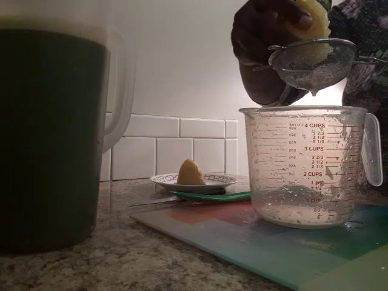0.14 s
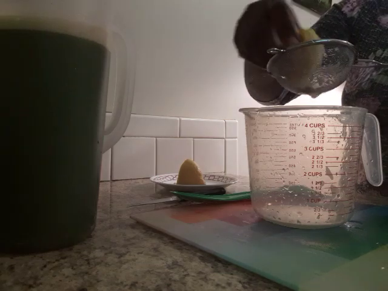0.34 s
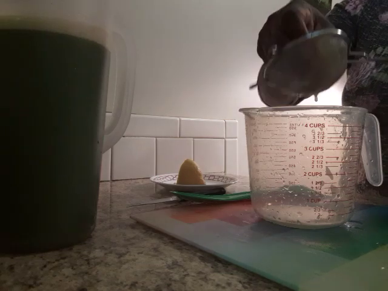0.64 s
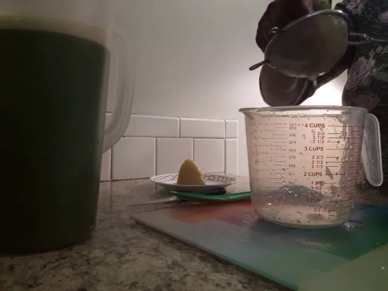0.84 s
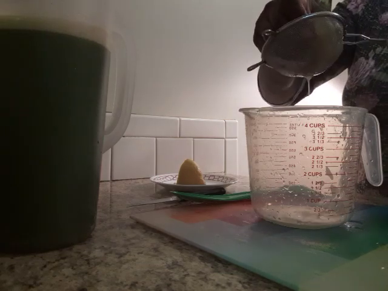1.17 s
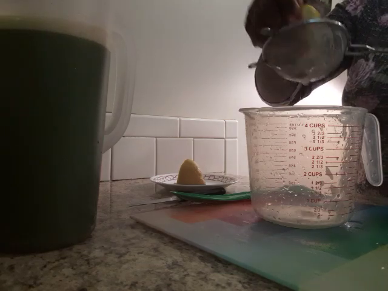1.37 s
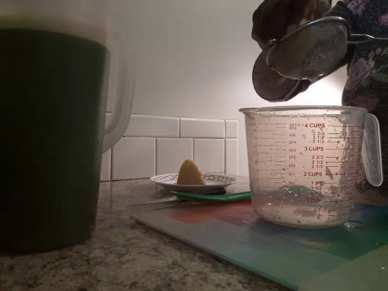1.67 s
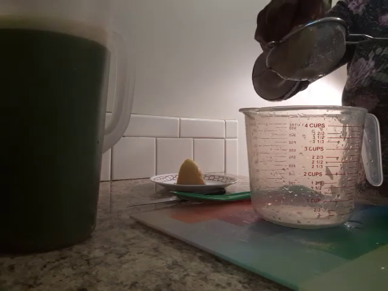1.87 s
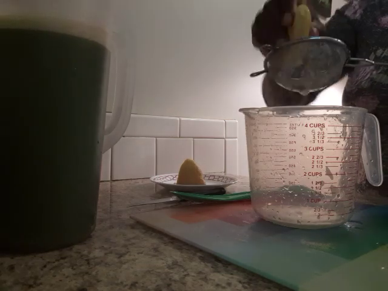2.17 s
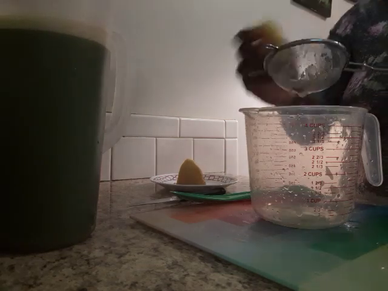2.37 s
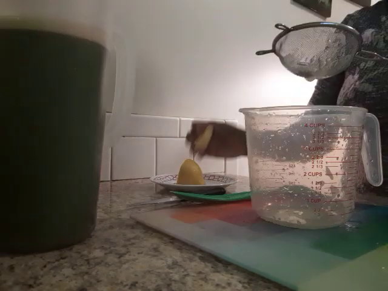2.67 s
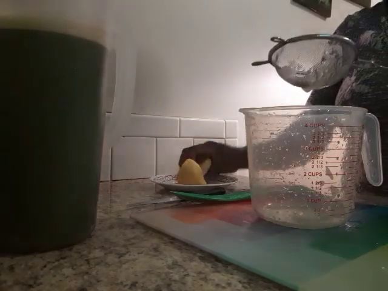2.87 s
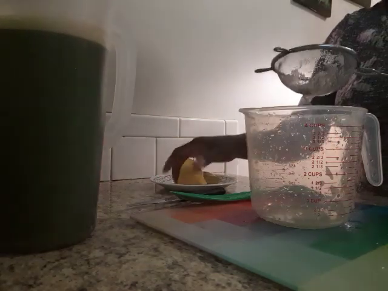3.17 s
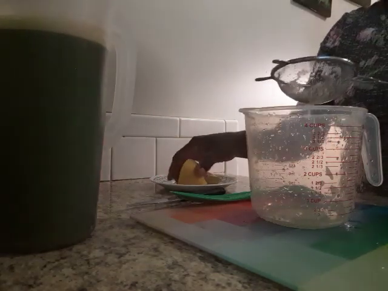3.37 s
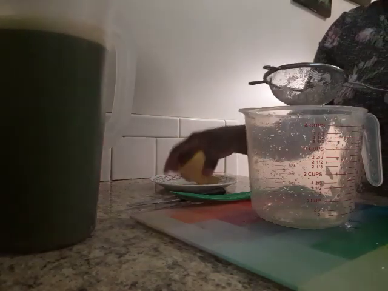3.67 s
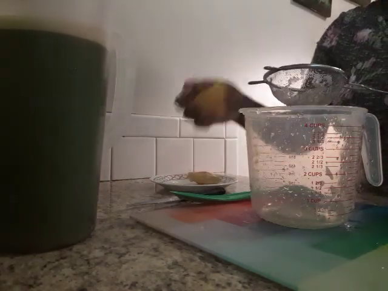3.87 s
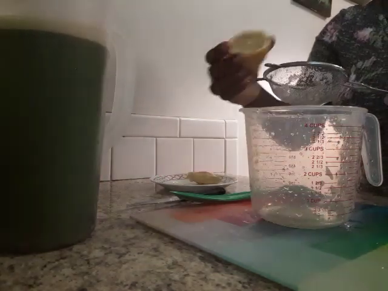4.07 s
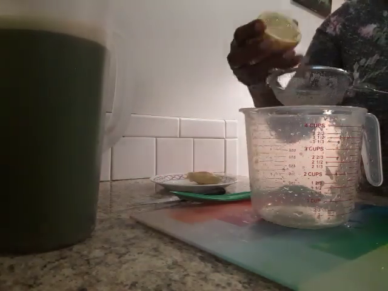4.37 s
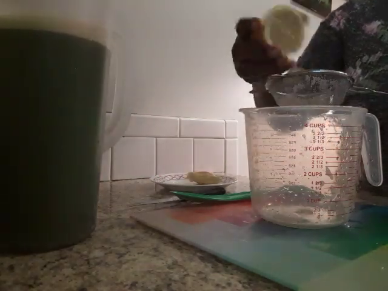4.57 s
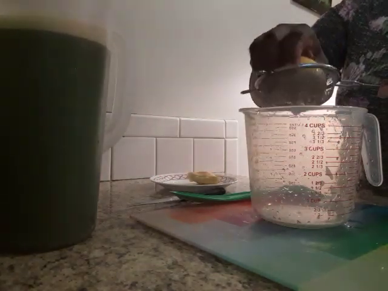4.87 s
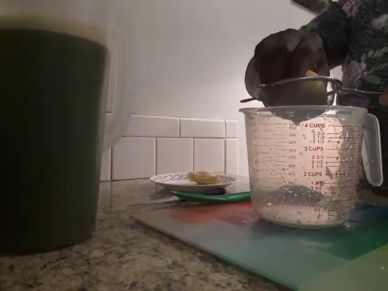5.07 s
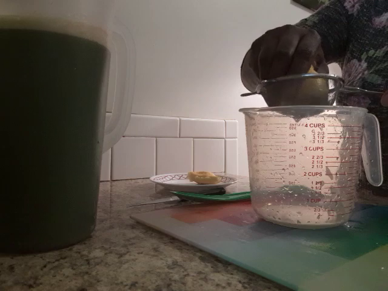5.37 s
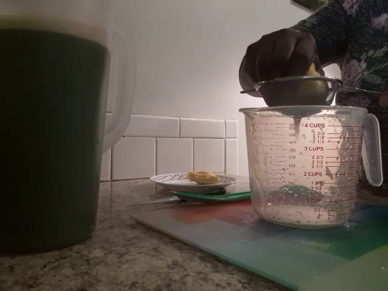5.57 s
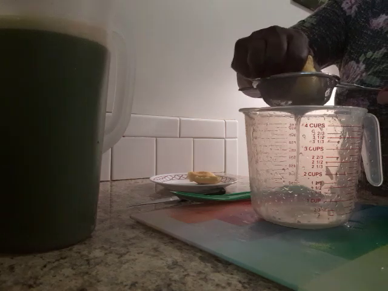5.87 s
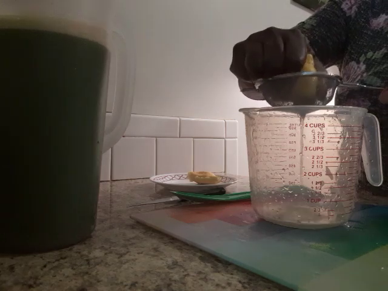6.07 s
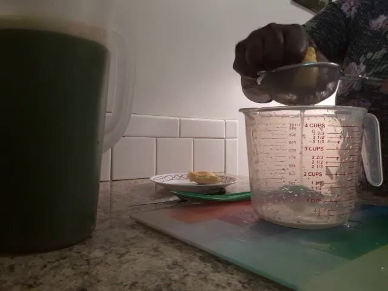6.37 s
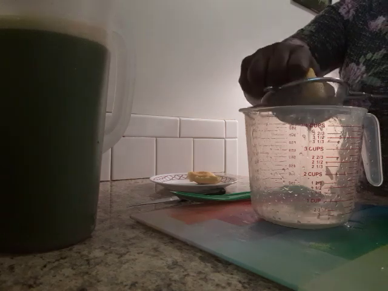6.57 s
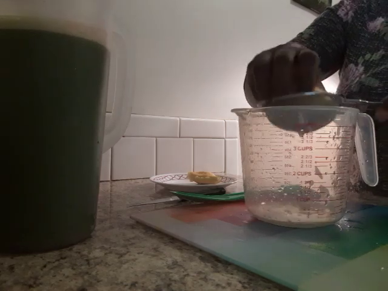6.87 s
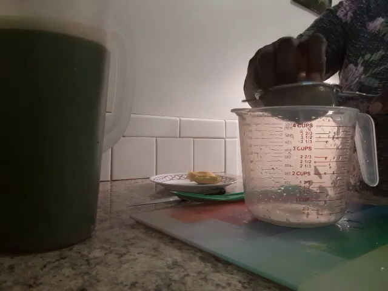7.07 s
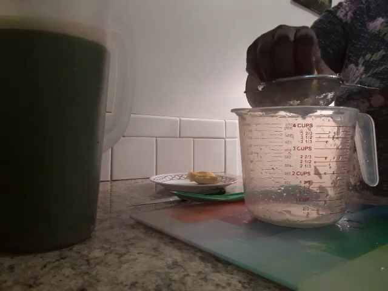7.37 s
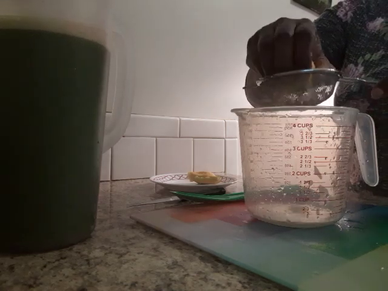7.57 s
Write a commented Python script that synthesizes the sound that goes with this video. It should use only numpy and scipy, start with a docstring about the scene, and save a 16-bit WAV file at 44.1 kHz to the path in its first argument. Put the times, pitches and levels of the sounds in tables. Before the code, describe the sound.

Lemon halves squeezed by hand over a metal strainer, pulp squelching and popping, juice squirting and dripping into a plastic jug, soft counter thumps midway.

```python
"""In a tiled kitchen, lemon halves are squeezed by hand over a steel strainer, close to a stereo microphone.
Pulp squelches and pops as grainy noise, juice squirts as sputtering noise through a slit, and drops ring a plastic jug.
A spent half is set on a saucer and the counter under the microphone booms as damped low modes.
The hands are nearer the left port; tiles echo, narrow tones and hums swell, and the house rumbles faintly."""
import sys
import numpy as np
from scipy import signal
from scipy.fft import rfft, irfft, next_fast_len
from scipy.io import wavfile
from scipy.ndimage import map_coordinates

SR = 44100
rng = np.random.default_rng(int(sys.argv[2]) if len(sys.argv) > 2 else 0)


def generate_wav(signal):
    """Clip the signal to [-1, 1] and save it as 16-bit WAV at the path in sys.argv[1]."""
    frames = np.transpose(np.atleast_2d(signal))
    scaled = np.clip(frames, -1, 1) * 32767
    pcm = np.round(scaled).astype(np.int16)
    wavfile.write(sys.argv[1], SR, pcm)


N = 340893  # samples

# Juice and air forced through pulp, sleeves brushing between: time_s, hiss_db, body_db (wet body against hiss)
SQUEEZE_FLOW = [(0.0, -65, -26), (0.32, -69, -31), (0.46, -74.5, -11), (0.62, -63.5, -14.5),
                (0.76, -79, -15), (0.95, -69.5, -1), (1.2, -77, -17), (1.4, -70, -26), (1.48, -85, -29),
                (1.8, -82.5, -35), (2.02, -74, -5), (2.3, -88, -19), (2.6, -70.5, -8.5),
                (2.77, -78.5, -2.5), (2.95, -67.5, -3), (3.13, -78.5, 8), (3.29, -69.5, -4),
                (3.42, -83.5, -0.5), (4.2, -111, 22.5), (4.69, -68, -11.5), (5.0, -79, 0),
                (5.23, -63.5, -5.5), (5.6, -66, -7), (5.98, -59, -10), (6.3, -67, -1.5), (6.88, -65, -4),
                (7.0, -74, 1.5), (7.36, -80, 8), (7.45, -76, 5.5), (7.6, -64.5, 0.5), (7.73, -80, 6.5)]
# Relative spectra of the hiss, the fine spray and the wet body: pitch_hz, level_db
HISS_SPECTRUM = [(1060, -45), (1800, -34.5), (2090, -9.5), (3410, -2), (3850, -2.5), (4500, -4),
                 (6010, -0.5), (7710, -6), (9000, -9), (11700, -49), (19800, -120)]
SPRAY_SPECTRUM = [(5000, -20.5), (8000, -10), (11000, 7), (16500, 2)]
BODY_SPECTRUM = [(350, 3.5), (700, 2.5), (1200, 1.5), (2000, -2), (3000, -25.5)]
# Squirts from the rind: start_s, level_db (before the swell and decay), centre_hz, width_hz, t60_s
RIND_SQUIRTS = [(.6, -52.5, 6060, 3000, 0.18), (0.901, -68, 7000, 6000, .04), (1.358, -69, 3440, 1200, .1),
                (1.902, -59, 2620, 940, 0.6), (1.91, -59, 3640, 2500, 0.37),
                (2.177, -68, 8500, 6000, 0.098), (4.276, -73.5, 3560, 1210, 1),
                (4.998, -68, 11100, 1500, .2), (5.294, -45.5, 9300, 7000, 0.033),
                (5.34, -54, 4400, 4160, 0.1), (5.466, -44.5, 3500, 2030, 0.28),
                (5.47, -59.5, 1430, 1210, 0.44), (5.475, -41.5, 10500, 7160, 0.2),
                (5.507, -43.5, 5640, 2500, 0.28), (5.841, -57, 9300, 6000, 0.3),
                (6.101, -45, 10100, 5000, 0.095), (6.375, -48, 9000, 9100, 0.02),
                (6.628, -52.5, 3900, 1200, 0.043), (6.661, -49, 8400, 5040, 0.054),
                (6.652, -52.5, 3030, 500, 0.036), (6.678, -47.5, 3210, 700, 0.042),
                (6.685, -54, 1680, 400, 0.038), (6.682, -55, 12600, 4000, 0.055),
                (6.861, -53, 6400, 1985, 0.041), (7.049, -68.5, 3350, 905, 0.08),
                (7.048, -65.5, 6030, 2000, 0.11)]
# Pops of pulp and ticks of the mesh: start_s, level_db, centre_hz, edge_db (bright edge against body)
PULP_POPS = [(0.0472, -44, 7060, -6), (0.598, -33, 5300, -40), (0.6719, -25.5, 6660, 16),
             (0.8932, -39, 8200, 15), (0.9208, -35.5, 6240, -14), (0.9513, -26, 3240, 21),
             (0.9895, -27, 3000, 15.5), (1.12, -44, 4600, -24), (1.1543, -42, 2800, -19),
             (1.293, -43.5, 7240, -19.5), (1.336, -32.5, 7900, -7), (1.648, -50.5, 6630, -11),
             (1.837, -47, 8200, -15), (1.8786, -42, 4860, 7), (1.9083, -54, 2700, -21),
             (3.0078, -44, 6050, -10), (3.056, -45, 4960, -25), (3.1597, -52, 6100, -23),
             (3.1784, -47, 4970, -26), (3.2645, -43.5, 4810, -25), (4.3352, -49, 4080, -31),
             (4.669, -50, 7140, -24), (4.8885, -54, 6460, 6), (5.0593, -52, 2870, 16),
             (5.155, -48, 6440, -80), (5.2046, -40.5, 5200, -18), (5.252, -43, 6340, -8),
             (5.301, -38, 8500, 5), (5.3228, -31.5, 8650, 19.5), (5.472, -25.5, 3400, -32),
             (5.7586, -42, 5900, 27), (5.8178, -31.5, 2580, -31), (5.9955, -31, 3400, 1),
             (6.077, -33, 8500, -10), (6.106, -25.5, 8200, -30), (6.1463, -25.5, 2650, 8),
             (6.2437, -29.5, 6340, 5), (6.331, -27, 6400, -31), (6.355, -28.5, 2800, -23),
             (6.3856, -23.5, 2450, 11.5), (6.4328, -25, 6340, -19), (6.572, -40, 6440, -18),
             (6.6139, -38, 6900, -30), (6.6292, -31.5, 3940, -15), (6.6588, -33, 3220, 13),
             (6.7775, -27.5, 1600, -28), (6.838, -30.5, 1510, -28), (6.871, -36, 5870, -7),
             (6.909, -44.5, 7600, -21), (7.219, -48.5, 4900, -35), (7.2382, -45.5, 5080, -21),
             (7.3014, -46.5, 9000, 0), (7.5086, -51, 7850, -25), (7.5383, -48, 5700, -27.5),
             (7.5778, -44, 5200, -30)]
# Resonances of the strainer's wires: pitch_hz, level_db, t60_s
STRAINER_MODES = [(2063, -36, .02), (4500, 3.5, 0.018), (4965, 8.5, 0.026), (5290, -16, 0.03),
                  (5740, 8.5, 0.024), (6120, 6, 0.025), (6700, 7, 0.067), (8200, -23, 0.03)]
# Strainer struck: start_s, level_db
STRAINER_TAPS = [(6.329, -34.5), (6.4314, -13.5)]
# Drops landing in the jug: start_s, level_db, upper_db (upper modes against lower)
JUG_DRIPS = [(0.426, -56.5, 4.5), (0.672, -61.5, -3), (0.888, -64, 0), (0.992, -44, -25), (1.081, -55, 0),
             (1.129, -48.5, 0.5), (1.157, -55, 5.5), (1.227, -56.5, 7), (1.291, -50.5, 5.5),
             (1.334, -55, 3), (1.403, -66, -6), (1.482, -62, 0), (1.543, -65, -1), (1.704, -62, 9.5),
             (2.009, -55.5, 1), (2.342, -61, -2.5), (3.576, -60, -1), (4.614, -59, -5), (5.354, -60, -19),
             (5.471, -57, -21), (5.487, -47, -21), (5.756, -42.5, -2), (5.815, -45.5, -6), (5.904, -59, 0),
             (5.976, -40.5, 1.5), (5.995, -38.5, 4), (6.024, -56, 4), (6.049, -49, -5),
             (6.075, -38.5, -2.5), (6.146, -33.5, -0.5), (6.176, -44, 5), (6.199, -50, 6),
             (6.244, -51, 5.5), (6.299, -56, 0), (6.329, -41.5, 4), (6.356, -35.5, -2.5), (6.388, -37, 2),
             (6.431, -39.5, 0.5), (6.494, -44, -10), (6.512, -41.5, 1.5), (6.572, -44, 2.5),
             (6.614, -46.5, 2), (6.7, -49.5, -15), (6.878, -42, -22.5), (6.981, -53, -22),
             (7.114, -54.5, -5), (7.165, -55, -4), (7.2, -53, -10), (7.618, -50.5, -5), (7.648, -54.5, -4)]
# Resonances of the jug's walls: pitch_hz, level_db, t60_s
JUG_MODES = [(529.7, -15.5, 0.12), (607.8, -4.5, 0.14), (658.3, -4.5, 0.075), (758, -13.5, 0.1),
             (820, -7.5, 0.11), (901, -8.5, 0.078), (1284, -17, 0.051), (1681, -11, 0.046),
             (2090, -16, 0.0083), (3120, -29, 0.11)]
# Thin patter of juice: start_s, length_s, level_db
JUICE_STREAM = [(1.12, 0.39, -73), (5.79, 0.9, -63.5)]
# Sleeve rubbing and strainer bumping on the jug:
# start_s, level_db (before the swell and decay), centre_hz, width_hz, t60_s
JUG_CONTACTS = [(.35, -76.5, 480, 250, 0.68), (.47, -67.5, 580, 500, .1), (.48, -79, 1340, 500, .2),
                (2.8, -68, 680, 348, 0.35), (6.778, -55.5, 346, 600, 0.3), (6.83, -55.5, 500, 400, 0.13),
                (6.865, -54, 294, 250, 0.27), (6.96, -69.5, 300, 500, 0.45)]
# Resonances of the saucer: pitch_hz, level_db, t60_s
SAUCER_MODES = [(3990, 7, 0.2), (5280, 2, .15), (6750, -4, .06)]
# Saucer touched: start_s, level_db
SAUCER_CLINKS = [(2.833, -73), (2.975, -64)]
# Saucer, hand and nudged jug bumping the counter: start_s, level_db
COUNTER_BUMPS = [(2.829, -31.5), (2.867, -29), (2.972, -32), (3.006, -25), (3.056, -17), (3.177, -19.5),
                 (3.195, -16.5), (3.235, -25), (3.299, -37.5), (3.363, -28.5), (3.389, -36.5),
                 (3.439, -45.5), (3.49, -47), (6.781, -51), (6.822, -49), (6.875, -43), (6.901, -44.5)]
# Resonances of the counter slab: pitch_hz, level_db, t60_s
COUNTER_MODES = [(89.1, -13.5, 0.36), (131.6, -0.5, 0.24), (149.7, -8, .12), (220.2, -16, 0.19),
                 (268.2, -10, 0.11), (310, -14, 0.14), (394, -24, 0.17), (503, -30, 0.099)]
# Faint narrow tones, then low hums, that swell and fade: start_s, end_s, start_hz, end_hz, width_hz, level_db
FAINT_TONES = [(.5, .86, 1220, 1185, 111, -74.5), (1.88, 2.32, 1260, 1103, 50.4, -81.5),
               (2.62, 2.97, 490, 523, 93, -71.5), (3.7, 3.949, 500, 511, 142, -71.5)]
LOW_HUMS = [(1.8, 2.7, 66.1, 76, 6.9, -67.5), (4.2, 5.0, 110.4, 110.7, 7.1, -62)]
# Deep rumble of the house: time_s, level_db
HOUSE_RUMBLE = [(0, -69), (2, -70.5), (3.6, -66), (4.4, -69.5), (5.8, -64.5), (6.9, -63), (7.73, -65.5)]
# Relative spectra of the rumble, the drone, and the room air with microphone hiss: pitch_hz, level_db
RUMBLE_SPECTRUM = [(25, -36), (45, -10.5), (75, -11.5), (110, -13.5), (200, -45.5)]
DRONE_SPECTRUM = [(60, -17), (85, -0.5), (120, -1.5), (170, -5), (220, -5), (260, -12.5), (340, -18),
                  (450, -37), (800, -61)]
AIR_SPECTRUM = [(180, -33), (300, 3), (361, -8), (496, -5), (863, -10.5), (970, -13), (5100, -13.5),
                (6670, -6.5), (8730, -19.5), (14900, -13), (16500, -32)]
# Likeness of the house's left and right: pitch_hz, likeness (0 to 1)
LEFT_RIGHT_LIKENESS = [(60, .97), (250, 0.89), (600, 0.26), (2000, 0), (16000, 0)]
# Decay of the kitchen's echo: pitch_hz, t60_s
KITCHEN_DECAY = [(300, 0.22), (2000, 0.36), (6000, 0.24), (14000, 0.26)]

# Spray at the usual hiss, that usual hiss, spray dB per dB of hiss, spray dB per dB less of wet body
SPRAY_DB, USUAL_HISS_DB, SPRAY_GROWS, DRY_SPRAYS = -81, -71, 0.48, 0.31
SQUIRT_RISE_S, SQUIRT_HOLD_S, SQUIRT_FLUTTER_DB = 0.0047, 0.018, 4.5
CONTACT_RISE_S, CONTACT_HOLD_S, CONTACT_FLUTTER_DB = 0.01, 0.037, 1.5
# Decay of a pop at the middle pitch, and the power by which higher ones die sooner
POP_T60_S, POP_MIDDLE_HZ, POP_SHORTENS = 0.021, 5000, 0.23
FAINT_POP_COUNT, FAINT_POP_DB = 40, 16  # least level, against the hiss around them
STREAM_EDGE_DB_PER_S = 250  # how fast the patter swells and thins out
KNOCK_DB = -9.5  # dull knock against the boom
DRONE_DB, DRONE_GROWS = -66, 1  # mean drone, its dB per dB of deep rumble
AIR_DB = -73.5
HANDS_LEFT_DB, HANDS_LEAD_S = 11, 0.000397  # left over right in the bass; left ahead of right
TOP_STEP_HZ, TOP_END_HZ = 15750, 16800


def squeeze():
    """Noise broken by tiny bursting cells; the flow comes in uneven surges, and more flow sprays more."""
    out, surge = np.zeros(N), wobble(13)
    hiss_db, body_db = curves(SQUEEZE_FLOW)
    spray_db = SPRAY_DB + SPRAY_GROWS * (hiss_db - USUAL_HISS_DB) - DRY_SPRAYS * body_db
    layers = [(hiss_db, HISS_SPECTRUM), (spray_db, SPRAY_SPECTRUM), (hiss_db + body_db, BODY_SPECTRUM)]
    for level_db, spectrum in layers:
        cells = (rng.random(N) < 500 / SR) * rng.exponential(size=N) * rng.standard_normal(N)
        grain = rng.standard_normal(N) + 0.5 * unit(cells)
        # the surge is common to all layers, the quicker flutter is each layer's own
        uneven_db = 2.2 * np.tanh(surge) + 3 * np.tanh(wobble(45))
        out += amp(level_db + uneven_db) * coloured(grain, spectrum)
    return out


def squirts():
    """Juice jets through slits in the rind as sputtering noise."""
    return bursts(RIND_SQUIRTS, SQUIRT_RISE_S, SQUIRT_HOLD_S, SQUIRT_FLUTTER_DB)


def pops():
    """Each pop is a burst of noise through a broad resonance, with a shorter bright edge."""
    out, t = np.zeros(N), np.arange(SR // 8) / SR
    bright = lambda f: (1j * f / (9000 + 1j * f)) ** 2
    for s, db, centre_hz, edge_db in [*PULP_POPS, *faint_pops()]:
        t60 = POP_T60_S * (POP_MIDDLE_HZ / centre_hz) ** POP_SHORTENS
        decay = amp(-60 * t / np.array([[t60], [0.18 * t60]]))
        onset = 1 - np.exp(-t / 0.00071)
        body, edge = rng.standard_normal((2, len(t))) * decay * onset
        peak = resonance(centre_hz, 0.6 * centre_hz)
        cell = lambda f: peak(f) + 0.08 * 1j * f / (500 + 1j * f)  # with a broad skirt
        add(out, s, amp(db) * (filtered(body, cell) + amp(edge_db) * filtered(edge, bright)))
    return out


def faint_pops():
    """Rows like those of PULP_POPS at chance moments, their strength following the squeezing hiss."""
    when, size, pitch, edge = rng.random((FAINT_POP_COUNT, 4)).T
    hiss_db = curves(SQUEEZE_FLOW)[0][(when * N).astype(int)]
    level_db = hiss_db + FAINT_POP_DB + 5 * size
    return zip(when * N / SR, level_db, 3000 + 5000 * pitch, -10 - 20 * edge)


def strainer():
    """Taps make the wires chatter for a moment: a noise burst through the mesh's resonances."""
    out, t = np.zeros(N), np.arange(SR // 8) / SR
    wires = lambda f: sum(amp(level) * resonance(hz, 2.2 / t60 + 120)(f) for hz, level, t60 in STRAINER_MODES)
    for s, db in STRAINER_TAPS:
        rattle = rng.standard_normal(len(t)) * amp(-60 * t / 0.021)
        add(out, s, amp(db) * filtered(rattle, wires))
    return out


def drips():
    """Drops ring the jug's walls and splash; a big flat drop favours the lower modes."""
    out, t = np.zeros(N), np.arange(SR // 5) / SR
    upper = np.array([hz > 700 for hz, _, _ in JUG_MODES])
    soft = 1 - np.exp(-t / 0.0018)  # a wet landing starts softly
    for s, db, upper_db in JUG_DRIPS:
        burst = rng.standard_normal(len(t)) * amp(-60 * t / 0.05)
        splash = filtered(burst, resonance(3300, 2000))
        walls = ring(JUG_MODES, upper * upper_db, 0.2, detune=0.024, spread_db=2.5)
        add(out, s, amp(db) * soft * (walls + amp(0.5) * splash))
    return out


def stream():
    """A patter of soft droplets excites the jug's walls, swelling and thinning at its ends."""
    walls = lambda f: sum(amp(db) * resonance(hz, 7 / t60)(f) for hz, db, t60 in JUG_MODES)
    rounded = lambda f: walls(f) * (1200 / (1200 + 1j * f)) ** 2  # droplets land softly
    droplets = (rng.random(N) < 160 / SR) * rng.standard_normal(N)
    spatter = unit(filtered(droplets + 0.0043 * rng.standard_normal(N), rounded))
    now, gain = np.arange(N) / SR, np.zeros(N)
    for start, length, db in JUICE_STREAM:
        outside_s = np.clip(np.maximum(start - now, now - start - length), 0, None)
        gain += amp(db - STREAM_EDGE_DB_PER_S * outside_s)
    return spatter * gain


def jug_contacts():
    """Sleeve rubbing and strainer bumping on the jug: grainy noise coloured by its wall."""
    return bursts(JUG_CONTACTS, CONTACT_RISE_S, CONTACT_HOLD_S, CONTACT_FLUTTER_DB)


def saucer():
    """Each touch rings the saucer's damped high modes."""
    out = np.zeros(N)
    for s, db in SAUCER_CLINKS:
        add(out, s, amp(db) * ring(SAUCER_MODES, 0, 0.4, detune=0.00096))
    return out


def counter():
    """Soft bumps drive the slab's low modes; a dull knock rides on each."""
    out, t = np.zeros(N), np.arange(SR // 2) / SR
    dull = lambda f: (500 / (500 + 1j * f)) ** 2
    for s, db in COUNTER_BUMPS:
        boom = ring(COUNTER_MODES, 0, 0.5, detune=0.01, spread_db=-2.0) * (1 - np.exp(-t / 0.0053))
        knock = filtered(rng.standard_normal(len(t)) * amp(-60 * t / 0.15), dull)
        add(out, s, amp(db) * (boom + amp(KNOCK_DB) * knock))
    return out


def gliding_tones(table):
    """Narrow noise and a little pure tone on a gliding centre, swelling and fading."""
    out = np.zeros(N)
    for start, end, from_hz, to_hz, width_hz, db in table:
        u = np.linspace(0, 1, round((end - start) * SR))
        narrow = lambda f: np.exp(-(2 * f / width_hz) ** 2)
        slow = filtered(rng.standard_normal((2, len(u))), narrow)
        turn = 2 * np.pi * np.cumsum(from_hz + (to_hz - from_hz) * u) / SR
        tone = (unit(slow[0]) + 0.16) * np.cos(turn) + unit(slow[1]) * np.sin(turn)
        swell = np.sin(np.pi * u ** 0.73)
        add(out, start, amp(db) * swell * unit(tone))
    return out


def house():
    """Low rumble, an uneven drone that follows it, and steady air, all as stereo noise."""
    deep_db, = curves(HOUSE_RUMBLE)
    drone_db = DRONE_DB + DRONE_GROWS * (deep_db - deep_db.mean()) + wobble(6.5)
    low = amp(deep_db) * diffuse(RUMBLE_SPECTRUM) + amp(drone_db) * diffuse(DRONE_SPECTRUM)
    return low + amp(AIR_DB) * diffuse(AIR_SPECTRUM)


def diffuse(spectrum):
    """Stereo noise, alike in the bass and unrelated in the treble."""
    turn = lambda hz: np.arccos(np.clip(along(LEFT_RIGHT_LIKENESS, hz), -1, 1)) / 2
    shares = lambda hz: amp(along(spectrum, hz)) * [np.cos(turn(hz)), np.sin(turn(hz))]
    mid, side = filtered(rng.standard_normal((2, N)), shares)
    return unit(np.array([mid + side, mid - side]))


def kitchen(x):
    """Counter and tiles answer at once, the room slower; the echo pattern is drawn anew every third of a second."""
    out, hop, delay = np.zeros((2, N + 2 * SR)), SR // 3, 90  # delay in samples
    for start in range(0, N, hop):
        hz, t, z = signal.stft(rng.standard_normal((2, SR * 2 // 5)), SR, nperseg=256)
        room = amp(-60 * t / along(KITCHEN_DECAY, hz)[:, None])
        early = amp(12.0 - 60 * t / 0.011)  # counter and tiles
        tail = signal.istft(z * (room + early), SR, nperseg=256)[1]
        tail = tail / np.linalg.norm(tail[0])
        wet = signal.fftconvolve(x[None, start:start + hop], tail, axes=1)
        out[:, start + delay:start + delay + wet.shape[1]] += wet
    return out[:, :N]


def ports(x, left_db, lead_s):
    """A near source reaches the left port earlier and louder, the level difference shrinking with pitch."""
    side = np.array([[1], [-1]])
    path = lambda f: np.exp(1j * np.pi * f * lead_s * side) * amp(-1.5 * side * f / 12000)
    return amp(side * left_db / 2) * filtered(np.array([x, x]), path)


def bursts(table, rise_s, hold_s, flutter_db):
    """Noise that swells, sputters in grains and dies; the opening or wall it excites sets its colour."""
    out, t = np.zeros(N), np.arange(SR // 2) / SR
    for s, db, centre_hz, width_hz, t60 in table:
        sputter = np.tanh(map_coordinates(rng.standard_normal(150), [t * 220]))
        cells = (rng.random(len(t)) < 1500 / SR) * rng.standard_normal(len(t))
        grain = rng.standard_normal(len(t)) + 0.52 * unit(cells)
        slit = resonance(centre_hz, width_hz)
        jet = filtered(grain, lambda f: slit(f) * (slit(f) + 0.98))
        decay = amp(-60 * np.clip(t - rise_s - hold_s, 0, 1) / t60)
        shape = np.clip(t / rise_s, 0, 1) * decay
        add(out, s, amp(db) * shape * unit(amp(flutter_db * sputter) * jet))
    return out


def ring(modes, gains_db, length_s, detune=0.021, spread_db=-1.0):
    """Damped sines of one blow, each at a new strength and slightly new pitch."""
    hz, db, t60 = np.transpose(modes)[:, :, None]
    t = np.arange(round(length_s * SR)) / SR
    chance = rng.standard_normal((3, len(modes), 1))  # strength, pitch, phase
    level_db = db + np.reshape(gains_db, (-1, 1)) + spread_db * chance[0] - 60 * t / t60
    turn = 2 * np.pi * hz * (1 + detune * chance[1]) * t + 0.75 * chance[2]
    onset = 1 - np.exp(-t / 0.00025)
    return np.sum(amp(level_db) * np.sin(turn), axis=0) * onset


def resonance(centre_hz, width_hz):
    """Causal response of one resonance."""
    return lambda f: 1j * f * width_hz / (centre_hz ** 2 - f * f + 1j * f * width_hz)


def coloured(x, spectrum):
    """x given a spectrum, at rms 1."""
    return unit(filtered(x, lambda hz: amp(along(spectrum, hz))))


def filtered(x, response):
    """x times a complex response of frequency."""
    m = next_fast_len(x.shape[-1] + 8192)
    return irfft(rfft(x, m) * response(np.fft.rfftfreq(m, 1 / SR)), m)[..., :x.shape[-1]]


def wobble(rate_hz):
    """A smooth random curve through rate_hz knots a second."""
    knots = rng.standard_normal(int(N * rate_hz / SR) + 4)
    return map_coordinates(knots, [np.arange(N) * rate_hz / SR])


def curves(rows):
    """One value per sample for each column after the time."""
    s, *columns = np.transpose(rows)
    return [np.interp(np.arange(N) / SR, s, column) for column in columns]


def along(points, hz):
    """Value at hz between (pitch_hz, value) points on a log axis."""
    f, v = np.transpose(points)
    return np.interp(np.log(hz + 1), np.log(f + 1), v)


def amp(db):
    """Gain of a level in dB."""
    return 10 ** (np.asarray(db) / 20)


def unit(x):
    """x at rms 1."""
    return x / np.sqrt(np.mean(x ** 2) + 1e-20)


def add(track, s, sound):
    """Mix a sound into the track at time s."""
    part = track[round(s * SR):][:len(sound)]
    part += sound[:len(part)]


def scene():
    """Hands and jug near the microphone, counter under it, house around."""
    hands = squeeze() + squirts() + pops() + strainer() + saucer()
    drops = drips() + stream() + jug_contacts() + gliding_tones(FAINT_TONES)
    booms = counter()
    near = ports(hands, HANDS_LEFT_DB, HANDS_LEAD_S) + ports(drops, left_db=9.5, lead_s=0.0001)
    wet = kitchen(amp(1.0) * hands + amp(-2) * drops + amp(-18) * booms)
    under = booms * amp([[0.4], [-0.4]])  # almost equal in both ports
    return near + wet + under + gliding_tones(LOW_HUMS) + house()


def record(dry):
    """The microphone drops the deep bass; the top end falls by a step, then stops."""
    bass = lambda hz: (1j * hz / (60 + 1j * hz)) ** 2
    top = lambda hz: np.where(hz < TOP_STEP_HZ, 1, amp(-27)) * (hz < TOP_END_HZ)
    return filtered(dry, lambda hz: bass(hz) * top(hz))


dry = scene()
out = record(dry)
generate_wav(out)
```